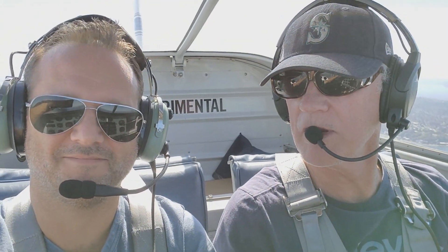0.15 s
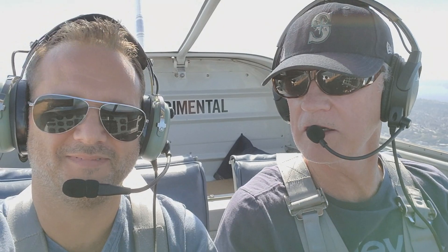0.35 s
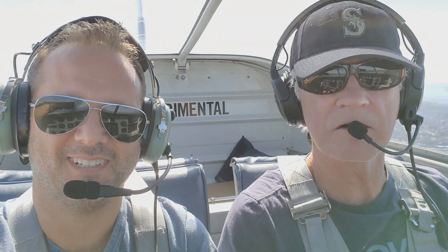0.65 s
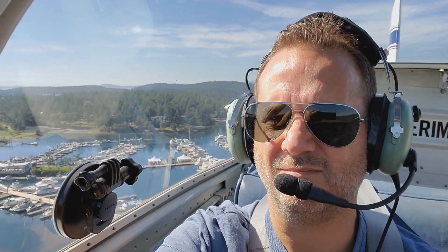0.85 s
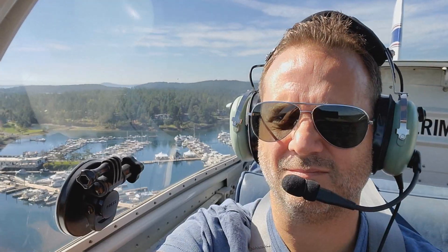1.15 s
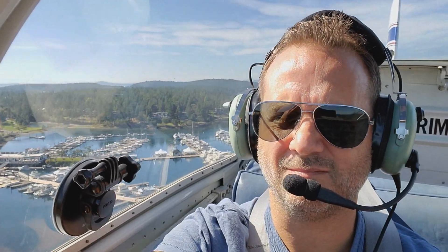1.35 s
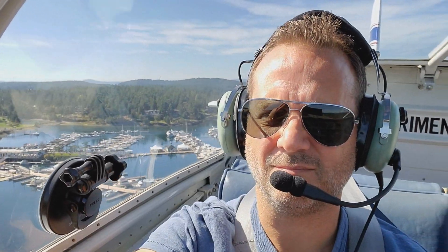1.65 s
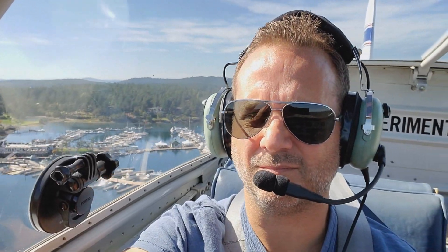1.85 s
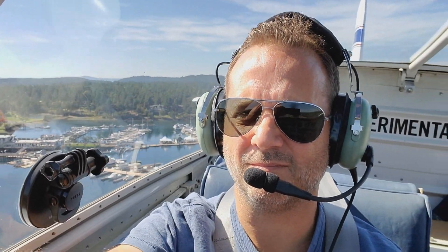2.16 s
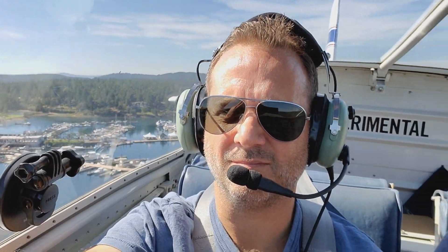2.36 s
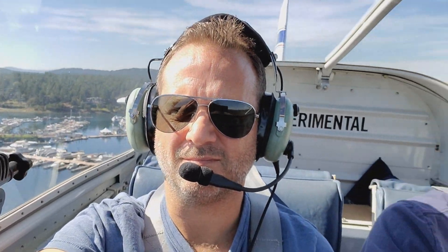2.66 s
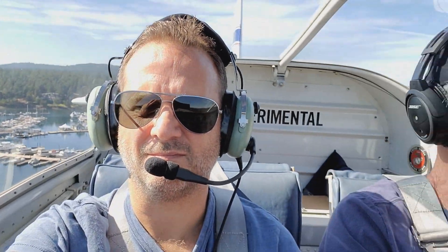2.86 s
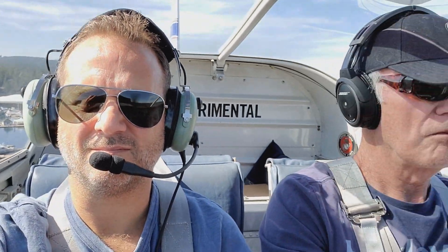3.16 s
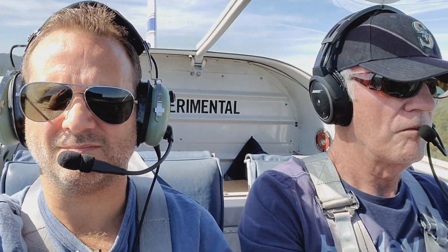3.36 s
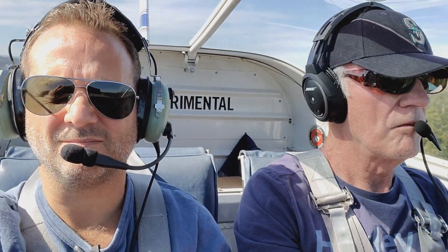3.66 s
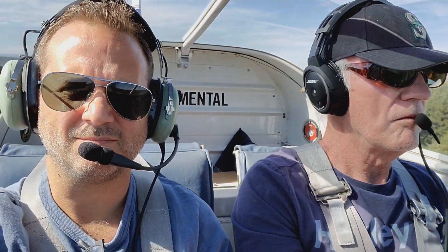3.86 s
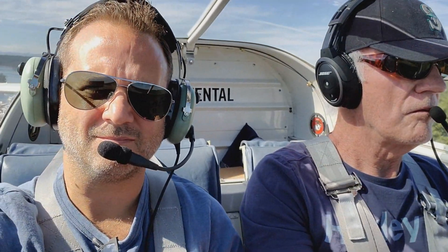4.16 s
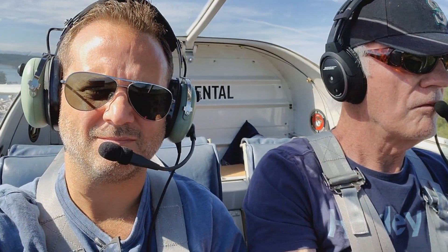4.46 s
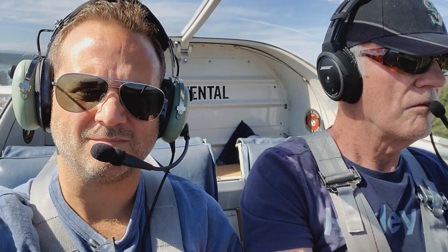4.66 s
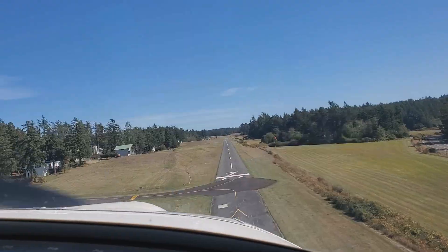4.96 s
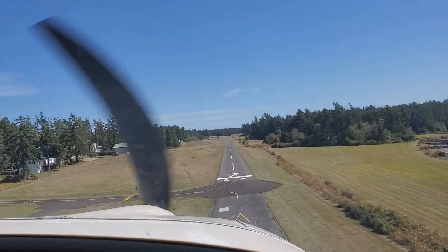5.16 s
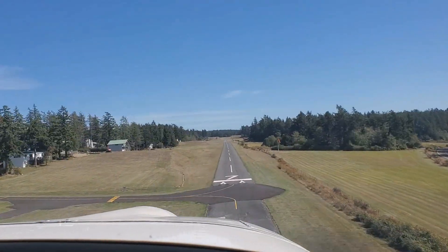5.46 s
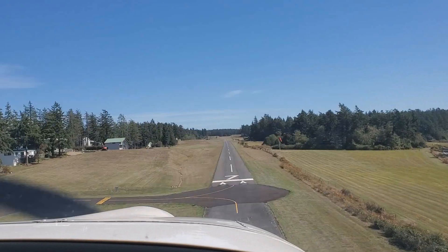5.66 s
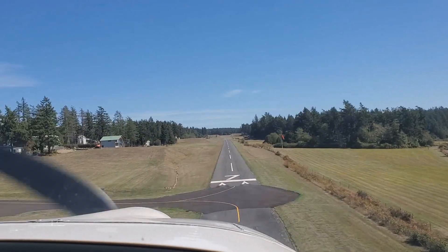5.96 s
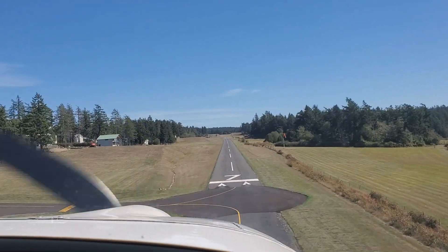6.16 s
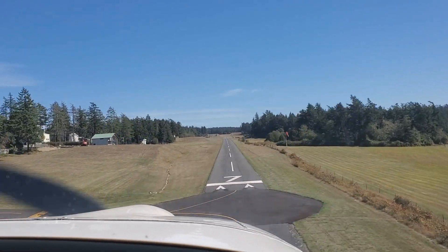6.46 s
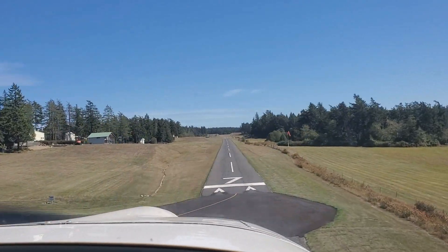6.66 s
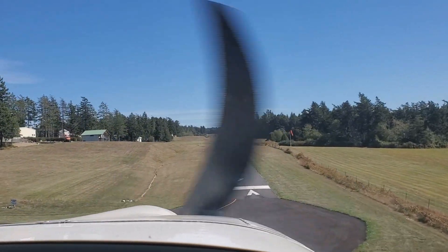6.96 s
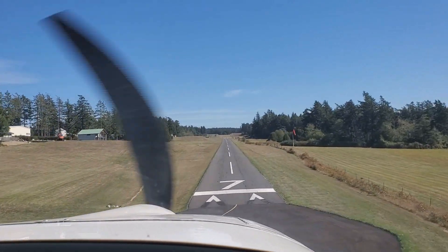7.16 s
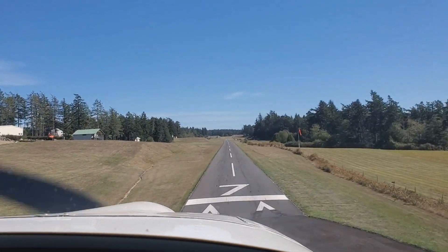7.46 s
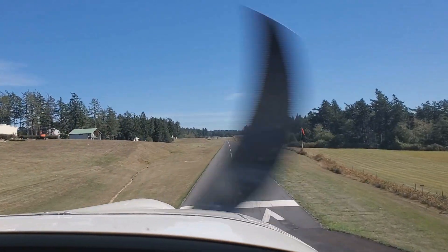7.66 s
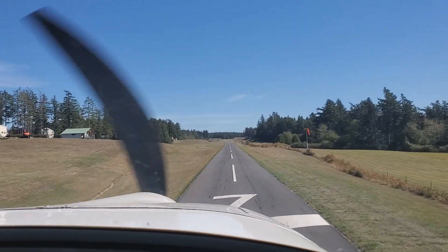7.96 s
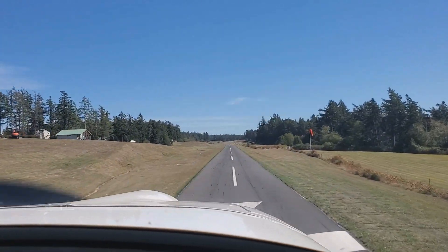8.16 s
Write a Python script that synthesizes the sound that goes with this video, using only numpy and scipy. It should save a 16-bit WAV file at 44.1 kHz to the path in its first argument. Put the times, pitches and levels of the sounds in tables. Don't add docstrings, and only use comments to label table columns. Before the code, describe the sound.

Handheld phone sound inside a small piston propeller plane, loud from the first instant. From 0 to 0.8 s, a cruise drone booms around 84 Hz with buzzing harmonics, rapid valve clatter and broad slipstream hiss. At 0.8 s it switches abruptly to a slower, steadier engine around 72 Hz, with quieter, duller air, sagging very slightly in pitch until 4.9 s. Another abrupt change brings the final approach: a rougher, weaker engine tone near 84 Hz sliding to about 76 Hz, under heavy low wind rumble. Irregular soft thumps of gusts flex the hull throughout. A loose fitting squeaks around 8 kHz, about forty tiny rising chirps a second, faint and broken at 5 to 5.5 s, firmer from 5.6 s, strongest from 6.3 to 7.7 s, then slightly weaker and interrupted. Air rush swells after 8 s; the sound stops abruptly at 8.3 s, still flying.

```python
import sys
import numpy as np
from scipy import signal
from scipy.fft import rfft, irfft, next_fast_len
from scipy.io import wavfile
from scipy.ndimage import uniform_filter1d, minimum_filter1d, map_coordinates

SR = 44100
rng = np.random.default_rng(int(sys.argv[2]) if len(sys.argv) > 2 else 0)


def magnitude_from_level(level_db):
    exponent = np.asarray(level_db, float) / 20
    return 10 ** exponent


def digitize_waveform(pressure):
    field = np.atleast_2d(pressure).T
    bounded = np.clip(field, -1, 1)
    quanta = np.round(bounded * 32767).astype(np.int16)
    wavfile.write(sys.argv[1], SR, quanta)


N = 366030


def columns(table, at):
    key, *rest = np.transpose(table)
    return [np.interp(at, key, column) for column in rest]


def over_hz(table, hz):
    rows = np.array(table, float)
    log_table = np.c_[np.log(rows[:, 0]), rows[:, 1:]]
    return columns(log_table, np.log(np.maximum(hz, 1)))


def walk(n, rate):
    hold = int(SR / rate)
    steps = np.repeat(rng.standard_normal(n // hold + 1), hold)
    return 1.2 * uniform_filter1d(uniform_filter1d(steps, hold), hold)[:n]


# time in seconds, flow in dB, buffet in dB.
AIRFLOW = [
    [(0, 0.5, 2.5), (.55, 0.9, 1), (.81, -1, 0.5)],
    [(.81, 0, -.5), (2.4, 0.3, 1), (2.9, -.5, 1.7), (4.2, -.9, 0.5), (4.925, 0.5, 0.5)],
    [(4.925, -0.7, -2), (5.5, -.4, -1.5), (6.2, -0.1, 1.5), (6.65, -0.4, -1), (7.0, -0.2, -3),
     (7.75, 0, -5), (8.05, 1.4, -0.5), (8.3, 3.5, -3)],
]
# dB per dB of flow, dB per dB of buffet.
FOLLOW = [(0, 1.5), (.6, 0.17), (1, 0.19), (1.2, 0.07)]
GUST_BOOM, GUST_RUMBLE, GUST_S = 1, 0.37, 0.03


def air_gains(t, airflow):
    boom, rumble, *rest = magnitude_from_level(np.dot(FOLLOW, columns(airflow, t)))
    coarse = t[::64]
    lift = 0
    for s, db, _ in THUMPS:
        lift = lift + magnitude_from_level(db) * np.exp(-((coarse - s - GUST_S / 2) / GUST_S) ** 2)
    gusts = np.interp(t, coarse, lift)
    return [boom * (1 + GUST_BOOM * gusts), rumble * (1 + GUST_RUMBLE * gusts), *rest]


# frequency in Hz, left minus right in dB,
# likeness from 0 to 1, left lead in radians.
PORTS = [(40, -3, 1, 0.22), (70, -0.7, 0.99, 0.19), (120, -1, 1, 0.13), (238, -1.5, 0.91, 0.045),
         (353, -5.5, 0.97, 0.052), (400, -11, 0.13, 0.84), (575, -5, 0.32, 0.21), (800, -7.5, 0.45, 1.),
         (1220, -6, 0.18, 2.55), (1500, -9, 0.25, 3.4), (2280, -9, 0.03, 4.2), (3400, -7, 0.01, 3.63),
         (4900, -4, 0.05, 3.85), (6960, -10.5, 0.01, 3.6), (8600, -1, 0.04, 3), (13000, -5, 0.02, 3.3)]


def ports(hz):
    balance_db, like, lead = over_hz(PORTS, hz)
    half = magnitude_from_level(balance_db / 2) * np.exp(.5j * lead)
    return np.array([half, 1 / half]), np.clip(like, 0, 1)


# time in seconds, rate in Hz.
CYCLE_CRUISE = [(0.0, 21.08), (0.81, 21.1)]
CYCLE_DESCENT = [(0.81, 18.17), (1.84, 18.18), (2.87, 18.05), (3.9, 17.87), (4.925, 17.85)]
CYCLE_FINAL = [(4.925, 20.92), (5.3, 21.075), (5.675, 20.525), (6.05, 20.14), (6.425, 20.015), (6.8, 19.71),
               (8.3, 18.97)]
# multiple of cycle rate, level in dB.
ORDERS_CRUISE = [(2, -46.0), (3, -34.5), (4, -16.1), (5, -24.6), (6, -27.9), (7, -29.1), (8, -21.4),
                 (9, -30.6), (10, -24.9), (11, -29.7), (12, -21.1), (13, -23.7), (14, -29.5), (15, -37.5),
                 (16, -30.5), (17, -41.3), (19, -45.7), (20, -39.1), (21, -37.7), (22, -47.1), (23, -37.6),
                 (24, -46.9), (25, -36.5), (26, -47.3), (27, -44.3), (28, -42.5), (29, -43.2), (31, -42.9),
                 (32, -46.6), (35, -48.1)]
ORDERS_DESCENT = [(3, -39.8), (4, -14.2), (5, -25.4), (6, -33.4), (7, -27.5), (8, -29.3), (9, -26.7),
                  (10, -33.4), (11, -31.7), (12, -28.2), (13, -42.9), (14, -42.8), (15, -28.1), (16, -24.7),
                  (17, -37.0), (18, -41.8), (19, -35.3), (20, -39.7), (22, -43.9), (23, -39.1), (24, -35.2),
                  (25, -42.9), (27, -46.7), (28, -43.1), (29, -45.2), (34, -43.5), (35, -46.0), (36, -45.6),
                  (37, -43.4), (38, -46)]
ORDERS_FINAL = [(2, -29), (3, -40), (4, -19.5), (6, -28), (8, -38), (10, -42), (12, -43)]
WANDER_DB = [.5, .85, 1.5]


def engine(phase, rate_hz, orders, wander_db, boom, rumble):
    n, out = len(phase), 0
    for k, db in orders:
        gain, like = ports(k * rate_hz)
        start = .5 - 2 * np.pi * .21 * k + 2.6 * wander_db ** 2 * rng.standard_normal()
        apart = np.arccos(like) * rng.standard_normal()
        rough = (1 + k / 12) * wander_db
        level = magnitude_from_level(db - 0.15 + rough * walk(n, 8.0))
        size = np.sqrt(2) * level * np.sqrt(boom if k < 7 else rumble)
        line = size * np.exp(1j * (k * phase + start + rough / 9 * walk(n, 8.0)))
        pair = gain * [1, np.exp(1j * np.clip(apart, -1.2, 1.2))]
        out = out + np.real(line * pair[:, None]) * 2 / np.abs(pair.sum())
    return out


CLATTER_DB = [-2, -1.1, -4.5]


def clatter(phase, size):
    steps = 512
    place = phase / (2 * np.pi) * steps
    rattles = rng.standard_normal((2, 2, steps))[..., place.astype(int) % steps]
    turn = .4 * walk(len(phase), 1.48)
    mixed = rattles[0] * np.cos(turn) + rattles[1] * np.sin(turn)
    return rfft(mixed, size) * np.sqrt(steps / 2 * 20 / (SR / 2))


def window_echo(hiss):
    n = hiss.shape[1]
    drift = np.array([walk(n, .7), walk(n, 0.75)])
    lag = np.array([[.00035], [.00026]]) * SR * (1 + 0.065 * drift)
    late = [map_coordinates(h, [np.arange(n) - d], order=3) for h, d in zip(hiss, lag)]
    return hiss + 0.18 * np.array(late)


# frequency in Hz, density in dB per Hz.
AIR_CRUISE = [(15, -36), (25, -28), (52, -15), (76, -8), (130, -6.5), (263, -10), (384, -15), (503, -16),
              (936, -25), (1560, -23.5), (1840, -30), (3820, -30.5), (7920, -37), (12200, -40),
              (16000, -42)]
AIR_DESCENT = [(15, -44.5), (25, -23), (47, -18), (80, -13), (120, -9), (236, -15), (285, -19), (384, -19),
               (624, -24.5), (775, -28), (1100, -29), (2350, -34), (7310, -44.5), (11600, -48),
               (16000, -54)]
AIR_FINAL = [(15, -41), (25, -16.5), (59, -0.5), (87, -1), (166, -9.5), (301, -13), (545, -21.5),
             (624, -22), (962, -26.5), (1230, -25), (1480, -29.5), (3160, -34), (6380, -41.5),
             (8360, -40.5), (16000, -52)]
AIR_DB = [-18.5, -21.5, -17.5]
# frequency in Hz, width in Hz, gain in dB.
CABIN = [(70, 4.8, -1.5), (287, 133, 2.5), (382, 29, -8.5), (575, 50, 0), (625, 57, 3.5), (940, 28, -3.5),
         (1108, 27, 5.5), (1490, 69, -2.5), (2040, 170, -2), (1290, 30, 3.5), (1813, 140, 3),
         (2340, 140, 2.5), (3120, 1030, 2.5), (7420, 1400, -4), (15600, 1800, 0)]


def slipstream(phase, spectrum, air_db, clatter_db, gains):
    n = len(phase)
    size = next_fast_len(n)
    hz = np.arange(size // 2 + 1) * SR / size
    cabin_db = sum(db / (1 + (2 * (hz - f) / w) ** 2) for f, w, db in CABIN)
    colour_db = over_hz(spectrum, hz)[0] + cabin_db
    gain, like = ports(hz)

    clatter_band = (hz / 700) ** 6 / (1 + (hz / 700) ** 6) / (1 + (hz / 2200) ** 2)
    air = rfft(rng.standard_normal((2, size)))
    one, other = air + magnitude_from_level(clatter_db) * clatter_band * clatter(phase, size)
    pair = magnitude_from_level(colour_db) * gain * np.array([one, like * one + np.sqrt(1 - like ** 2) * other])
    pair = pair * magnitude_from_level(air_db) / irfft(pair, size).std()

    lows = [1 / (1 + (hz / edge) ** 4) for edge in (140, 800, 5500)]
    shares = [lows[0], lows[1] - lows[0], lows[2] - lows[1], 1 - lows[2]]
    shaft_turn = np.cos(2 * phase)
    chop = [1, 1 + 0.034 * np.cos(phase) + 0.2 * shaft_turn, 1 + 0.025 * shaft_turn, 1 + 0.034 * shaft_turn]
    flicker = [magnitude_from_level(db * walk(n, 12.0)) for db in (0.97, 0.32, 0.3, 0.45)]
    bands = []
    for share, air_gain, c, f in zip(shares, gains, chop, flicker):
        bands.append(irfft(pair * share, size)[:, :n] * air_gain * c * f)
    *body, hiss = bands
    return sum(body) + window_echo(hiss)


# start in seconds, end in seconds, level in dB.
RUBS = [
    (4.95, 5.27, -44.5),
    (5.37, 5.39, -47),
    (5.45, 5.51, -45),
    (5.62, 6.3, -40.5),
    (6.3, 7.7, -36.3),
    (7.7, 8.09, -37.5),
    (8.15, 8.4, -36.5),
]
RUB_DB_PER_S, SLACK_DB = 350, -68


def rubbing_db(t):
    bouts = []
    for start, end, db in RUBS:
        outside_s = np.maximum(np.maximum(start - t, t - end), 0)
        bouts.append(db - RUB_DB_PER_S * outside_s)
    return np.maximum(np.max(bouts, axis=0), SLACK_DB)


# lag in ms, level in dB.
SQUEAK_PATHS = [
    [(0, 3.5), (5.27, -13), (8.3, -15), (14.4, -22)],
    [(.28, -10.5), (2.64, -13), (9.2, -8), (12.5, -13)],
]


def echoes():
    tail = rng.standard_normal((2, 1300)) * np.exp(-np.arange(1300) / (.012 * SR)) * magnitude_from_level(-29)
    for port, paths in enumerate(SQUEAK_PATHS):
        for lag_ms, db in paths:
            tail[port, int(abs(lag_ms) * SR / 1000)] += magnitude_from_level(db)
    return tail


# time in seconds, pitch in Hz.
SQUEAK_PITCH = [(4.93, 8050), (5.3, 8200), (5.6, 8280), (6.3, 8310), (7.66, 8320), (7.72, 8120),
                (8.0, 8230), (8.1, 8080), (8.3, 8120)]
# frequency in Hz, width in Hz, left in dB, right in dB.
PANEL = [(7660, 90, -4, 0), (8355, 80, -4, -6), (8700, 80, -9, -3), (8985, 60, 1, 5), (9250, 160, -5, -4)]
PANEL_GRIP = 0.65


def squeak(t, phase):
    n = len(t)
    turn = phase / np.pi
    level_db, pitch_hz = rubbing_db(t), columns(SQUEAK_PITCH, t)[0]
    luck = rng.standard_normal((int(turn[-1]) + 1, 3))[turn.astype(int)].T
    slip = np.clip((turn % 1 - .22 - 0.01127 * luck[0]) / 0.23, 0, 1)
    scatter_db = 1.1 + .5 * np.clip(-38 - level_db, 0, 10)
    push_db = level_db + 13.5 + scatter_db * luck[2] + 1.0 * walk(n, 700)
    push = np.sin(np.pi * slip) ** 2 * magnitude_from_level(push_db)
    cry_hz = pitch_hz + 20 + 25 * luck[1] + 380 * (slip - .4)
    scrape_hz = pitch_hz + 80 * luck[1] + 2300 * (slip - .4) + 200 * walk(n, 900)
    cry, scrape = push * np.sin(2 * np.pi * np.cumsum([cry_hz, scrape_hz], axis=1) / SR)

    rings = 0
    for f, w, left_db, right_db in PANEL:
        ring = signal.lfilter(*signal.iirpeak(f, f / w, SR), scrape)
        rings = rings + magnitude_from_level([left_db, right_db])[:, None] * ring
    direct = signal.fftconvolve([cry + magnitude_from_level(-23) * scrape], echoes(), axes=1)[:, :n]
    return direct + magnitude_from_level(1.5 + PANEL_GRIP * (level_db + 35.5)) * rings


# time in seconds, peak in dB, hull ring in Hz.
THUMPS = [(4.993, -2, 83.4), (5.17, -8, 79), (5.333, -11, 92), (5.474, 1, 87.5), (5.674, -7, 81.6),
          (5.751, -14, 70.0), (5.874, -2, 75.4), (6.186, -8, 83.4), (6.244, -9, 77.5), (6.29, -10, 80),
          (6.465, -13, 61.9), (6.59, -4, 85), (6.668, 0, 80.7), (6.742, -4, 74), (6.884, -11, 80),
          (7.012, -9, 79.5), (7.199, -14, 75.4), (7.31, -7, 83), (7.503, -17, 78.1), (7.634, -8, 76),
          (7.696, -5, 74), (7.84, -13, 77.6), (7.911, -0.5, 79), (8.136, -18, 80.7), (8.222, -5, 68)]
THUMP_S = .016


def thumps(t):
    out, age = np.zeros(len(t)), np.arange(int(.15 * SR)) / SR
    puff_band = signal.butter(2, (130, 450), "band", fs=SR, output="sos")
    puff = signal.sosfilt(puff_band, rng.standard_normal(len(t) + len(age)))
    swell = (age / THUMP_S) ** 2 * np.exp(2 - 2 * age / THUMP_S)
    for s, db, hz in THUMPS:
        a = max(int((s - .012 - t[0]) * SR), 0)
        flex = np.sin(2 * np.pi * hz * age)
        hit = magnitude_from_level(db - 4) * swell * (flex + magnitude_from_level(-1.5) * puff[a:a + len(age)])
        out[a:a + len(age)] += hit[:len(t) - a]
    return out * magnitude_from_level([-.4, .4])[:, None]


CUTS = [
    0,
    .81,
    4.925,
    8.3,
]
FADE_S = .006


def scene():
    legs = zip((CYCLE_CRUISE, CYCLE_DESCENT, CYCLE_FINAL), (ORDERS_CRUISE, ORDERS_DESCENT, ORDERS_FINAL),
               (AIR_CRUISE, AIR_DESCENT, AIR_FINAL), AIR_DB, WANDER_DB, CLATTER_DB, AIRFLOW)
    edges, fade = [int(s * SR) for s in CUTS[:-1]] + [N], int(FADE_S * SR)
    out = np.zeros((2, N + fade))
    for a, b, leg in zip(edges, edges[1:], legs):
        cycle, orders, air, air_db, wander_db, clatter_db, airflow = leg
        t = np.arange(a, b + fade) / SR
        rate_hz = columns(cycle, t)[0]
        phase = 2 * np.pi * np.cumsum(rate_hz) / SR
        gains = air_gains(t, airflow)
        cabin = engine(phase, rate_hz.mean(), orders, wander_db, *gains[:2])
        cabin = cabin + slipstream(phase, air, air_db, clatter_db, gains)
        if b == N:
            cabin = cabin + squeak(t, phase) + thumps(t)
        i = np.arange(len(t))
        ramp = np.minimum(i + (a == 0) * fade, i[::-1]) / fade
        out[:, a:b + fade] += cabin * np.sin(np.pi / 2 * np.clip(ramp, 0, 1))
    return out[:, :N]


def top_cut(x):
    return signal.sosfilt(signal.butter(12, 15760, fs=SR, output="sos"), x)


def record(dry):
    x = signal.sosfilt(signal.butter(6, 33, "high", fs=SR, output="sos"), dry)
    hold = int(.025 * SR)
    crest = uniform_filter1d(-minimum_filter1d(-np.abs(x).max(axis=0), hold), hold)
    x = x * np.minimum(1, 0.88 / crest) ** 0.21
    x = np.clip(np.tanh(.5 * x) / .5, -1, 1)
    x = signal.sosfilt(signal.ellip(14, .2, 110, 15760, fs=SR, output="sos"), x)
    return top_cut(x)


dry = scene()
out = record(dry)
digitize_waveform(out)
```